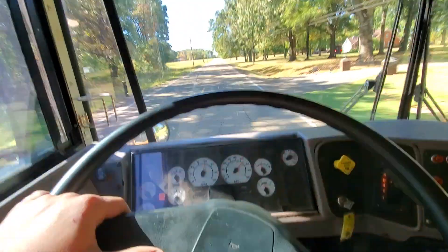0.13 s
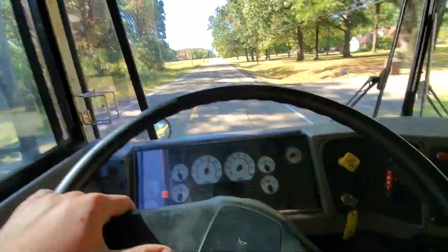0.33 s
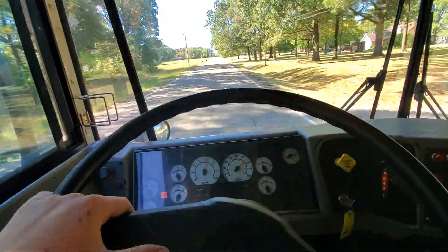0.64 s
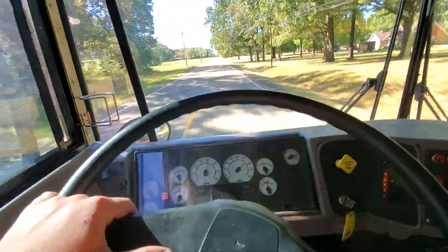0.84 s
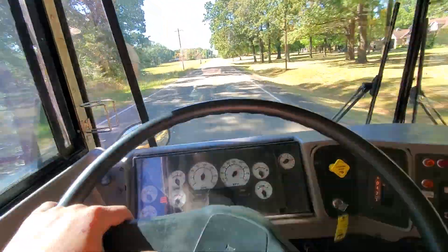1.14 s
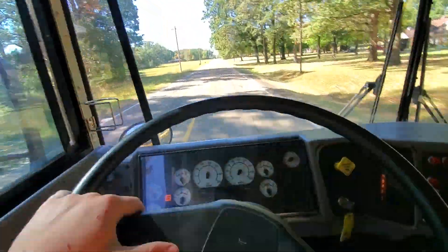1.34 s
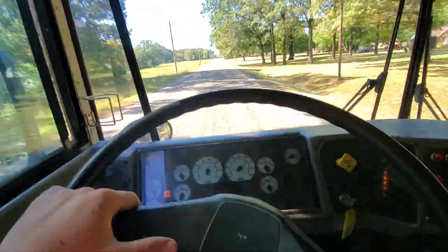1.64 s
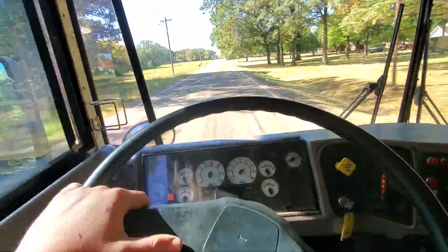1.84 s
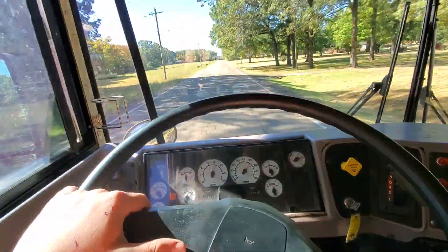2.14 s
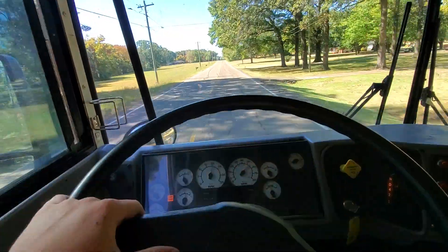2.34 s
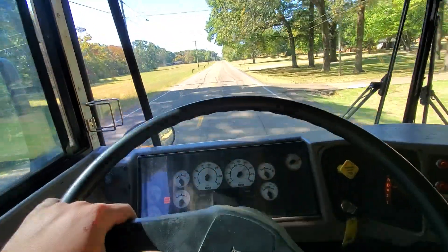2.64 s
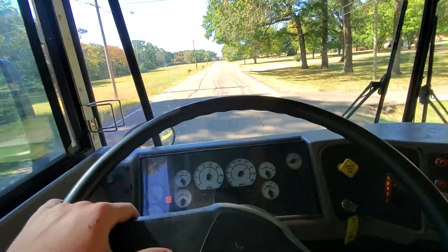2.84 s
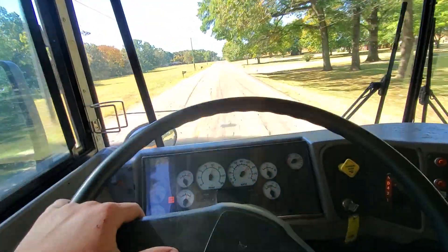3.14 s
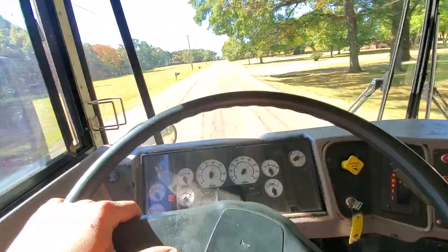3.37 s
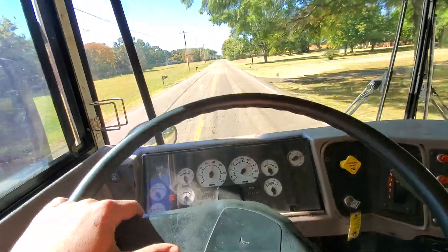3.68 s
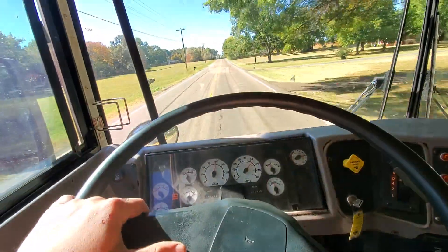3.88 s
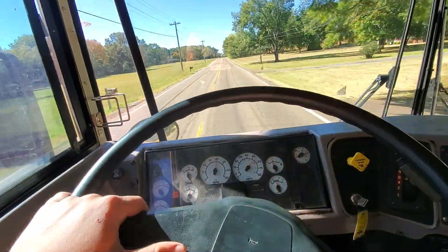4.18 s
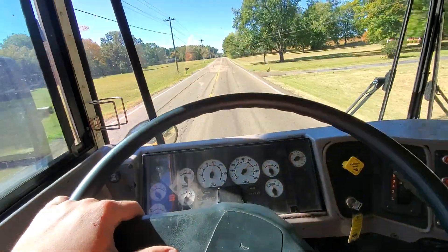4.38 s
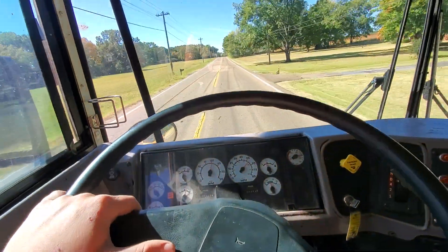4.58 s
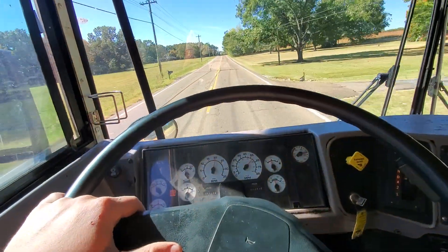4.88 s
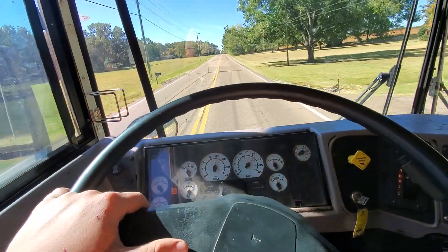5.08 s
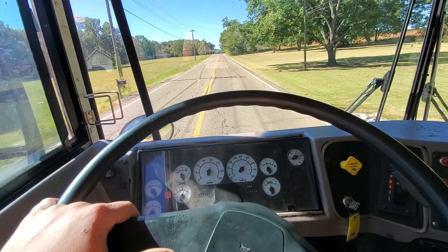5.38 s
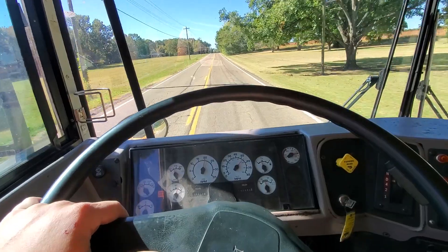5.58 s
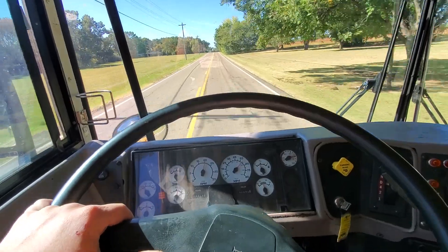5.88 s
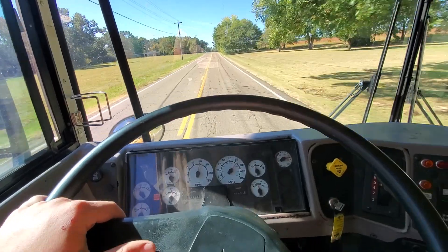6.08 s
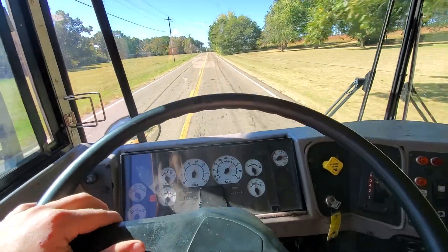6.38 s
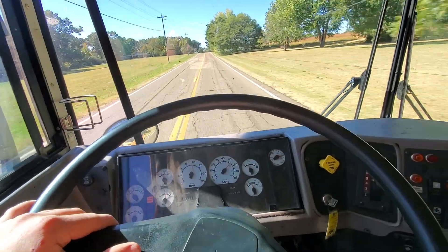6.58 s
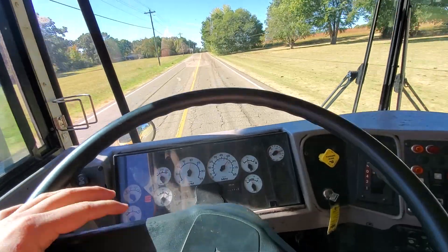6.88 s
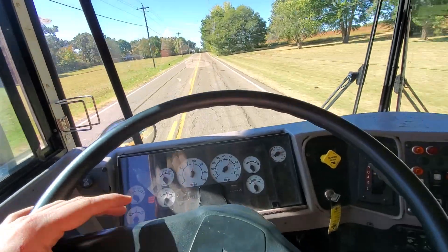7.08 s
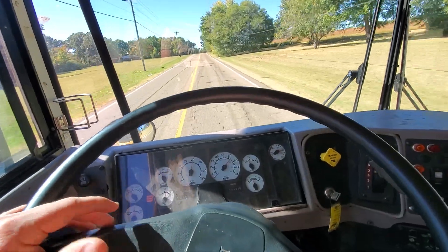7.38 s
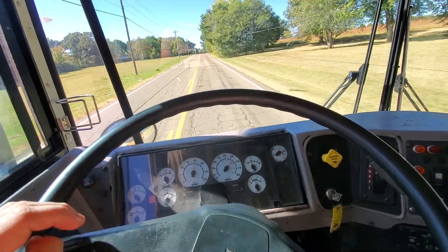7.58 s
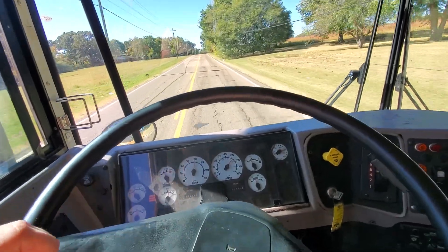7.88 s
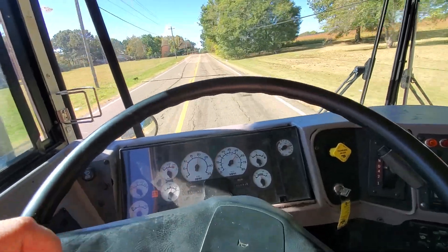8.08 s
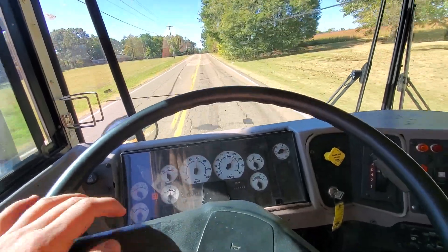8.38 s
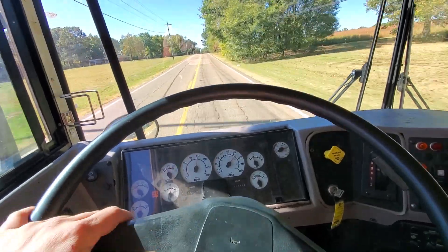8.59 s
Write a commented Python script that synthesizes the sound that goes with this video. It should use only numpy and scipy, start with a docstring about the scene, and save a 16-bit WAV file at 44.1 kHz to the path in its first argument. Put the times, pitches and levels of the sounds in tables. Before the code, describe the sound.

A diesel bus cruises along a country road, heard from the driver's seat for nearly nine seconds. From the start, a loud, deep engine drone holds one pitch with a fast throb, slightly stronger on the left. Tyres and rushing air roar steadily with it. Beneath these sit soft combustion clatter, a faint gear whine and a very thin, high turbo whistle. Bumps send short, low booms through the body at irregular intervals and lightly rattle the trim. The biggest boom comes at about 2.3 seconds, with a few small clicks. Coarse asphalt swells the road roar a little, most near 3.4 seconds. From 5 seconds, loose fittings give quiet, high ticks more often, and between about 5.9 and 7.3 seconds a small metal part chinks faintly several times. The drone and road noise carry on evenly to the end.

```python
"""A diesel bus cruising on a country road, heard from the driver's seat.
From the start the firing note beats against the propeller shaft's drone; combustion clatter and a thin
turbo whistle pass the engine cover, gears whine, tyres and air roar. Bumps boom in the body and rattle
loose fittings, with the biggest boom at 2.3 s. Coarse asphalt swells the roar most near 3.4 s.
From 5 s the fittings knock more often, and from 5.9 to 7.3 s a small metal part chinks."""
import sys
import numpy as np
from scipy import signal
from scipy.fft import rfft, irfft
from scipy.io import wavfile
from scipy.ndimage import uniform_filter1d

SR = 44100
rng = np.random.default_rng(int(sys.argv[2]) if len(sys.argv) > 2 else 0)


def unload_audio(sound):
    """Save the sound as a 16-bit wav file, at the path given as the first command line argument."""
    columns = np.transpose(np.atleast_2d(sound))
    # keep every value between -1 and 1, then stretch to whole-number steps
    steps = np.round(np.clip(columns, -1, 1) * 32767)
    wavfile.write(sys.argv[1], SR, steps.astype(np.int16))


N = 384548
TIME = np.arange(N) / SR
FREQ = np.maximum(np.arange(N // 2 + 1) * SR / N, 1)
CYLINDERS = 6


def engine_drone(cycles, low_db, high_db, waver_db, wander_rad):
    """Exhaust and block tones; the higher ones waver more as the cab flexes."""
    # engine tones (multiple of the cycle rate, relative left [dB], relative right [dB])
    orders = [(3, -37, -37), (6, -23.5, -24.5), (7, -44, -43), (9, -38.5, -41.5), (12, -41, -43),
              (15, -46, -51), (16, -44, -45), (18, -46, -44), (20, -55, -46), (30, -53, -46),
              (36, -55, -53), (39, -53, -64), (48, -57, -54), (54, -52, -54)]
    out = np.zeros((2, N))
    for order, left_db, right_db in orders:
        height = order / orders[-1][0]
        phase = 2 * np.pi * (order * cycles + rng.random()) + wander_rad * height * walk(4.8)
        offset_rad = np.array([[0], [1]]) * height ** 2 * np.pi / 2
        lift_db = low_db + (high_db - low_db) * height + waver_db * np.sqrt(height) * walk(2.5)
        gain = undb(np.array([[left_db], [right_db]]) + lift_db)
        out += np.sqrt(2) * gain * np.sin(phase + offset_rad)
    return out


def shaft_hum(firings, ratio, level_db, waver_db):
    """The propeller shaft hums just below the firing note, so the two beat."""
    gain = undb(level_db + waver_db * walk(2.4))
    return np.sqrt(2) * gain * np.sin(2 * np.pi * ratio * firings) * pan(1.2)


def body_boom(level_db, throb_db):
    """Bumps and the small unevenness between them shake the body into a deep boom."""
    # body spectrum (frequency [Hz], relative density [dB])
    spectrum = [(10, -73), (22, -61), (31, -37.5), (37, -35), (55, -30.5), (64, -33.5), (73, -28),
                (87, -32), (100, -42.5), (116, -46), (130, -59), (200, -99)]
    boom = colour(cab_noise(apart_hz=1200), response(spectrum))
    # flatten the noise's own swells so the road sets the level
    boom /= np.sqrt(uniform_filter1d(np.mean(boom ** 2, axis=0), SR // 8))
    return from_left(boom * undb(level_db + throb_db * walk(4.3)))


def bumps(attack_s, release_s):
    """Each jolt builds, holds and dies away; returns the boom and rattle lifts in dB."""
    # bumps under the wheels (start [s], length [s], boom lift [dB], rattle lift [dB])
    jolts = [(.25, .07, 3.5, 1.5), (0.402, 0.12, 4, 3), (0.723, 0.055, 4, -1), (1.295, 0.17, 4.5, 2),
             (1.628, 0.12, 3.5, 1), (1.876, 0.05, 6.5, 0), (2.313, 0.12, 8.5, 2), (2.69, .12, 4.5, -0.5),
             (2.987, 0.06, 3, -2), (3.29, .32, 3.5, 0.5), (3.724, 0.16, 6, 0.5), (4.2, 0.14, 3, -0.5),
             (4.85, 0.064, 2.5, -1), (5.581, .15, 6.5, 3), (5.76, .18, 1, 2), (6.358, 0.048, 7.5, 2),
             (6.54, 0.11, 5.5, 3.5), (6.7, .22, 1, 2), (7.013, 0.15, 6, 1), (7.4, 0.17, 3, -1),
             (7.99, 0.084, 3.5, 2), (8.36, 0.15, 5, 3)]
    out = np.zeros((2, N))
    for start_s, length_s, boom_db, rattle_db in jolts:
        attack = np.clip((TIME - start_s) / attack_s, 0, 1)
        release = np.exp(-np.maximum(TIME - start_s - length_s, 0) / release_s)
        out += np.outer([boom_db, rattle_db], attack * release)
    return out


def road_roar(gain_db, flicker_db):
    """Tyres roar on the asphalt and air rushes past the windows."""
    # tyre and air spectrum (frequency [Hz], relative density [dB])
    spectrum = [(70, -65), (125, -56.5), (180, -49.5), (260, -53.5), (340, -58), (390, -57.5), (510, -61.5),
                (620, -67), (800, -65), (980, -67), (1400, -71), (2200, -75), (5000, -83.5), (8000, -108)]
    roar = colour(cab_noise(apart_hz=880), response(spectrum))
    return roar * undb(gain_db + flicker_db * walk(6.5))


def coarse_asphalt():
    """The tyres run on and off each coarse stretch: a smooth swell in dB."""
    # coarse stretches (middle [s], length [s], roar lift [dB])
    patches = [(.25, 0.8, 1.5), (1.347, 1, 1.5), (2.42, 0.27, 1.1), (3.44, 0.74, 3), (5.75, .4, 1),
               (6.25, 0.54, 0.5), (6.92, .3, .9), (8.002, .35, 1.2), (8.4, 0.43, 2)]
    return sum(db * np.exp(-(2 * (TIME - middle_s) / length_s) ** 2) for middle_s, length_s, db in patches)


def clatter(firings, ring_s, rise_s, scatter_db, jitter_s, hiss_share, pulse_depth, gain_db):
    """Each cylinder's firing rings the block in its own way, over faintly pulsing gas hiss."""
    # clatter through the cover (frequency [Hz], relative left density [dB], relative right density [dB])
    spectrum = [(306, -83, -87), (710, -68, -73.5), (1500, -74.5, -77), (2140, -75, -73.5),
                (2640, -71, -70.5), (3400, -71, -69.5), (3850, -75.5, -71), (5080, -85.5, -77),
                (6000, -82.5, -76.5), (6660, -81, -76), (7380, -95, -88), (7960, -104, -104)]
    # cover and panel resonances (frequency [Hz], width [Hz], left lift [dB], right lift [dB])
    panels = [(1255, 42, 5.5, 1), (1400, 40, 8, 4), (2030, 19, 0, 6), (2457, 32, 8.5, -1), (2640, 47, 4, 3),
              (2707, 35, 5.5, 2), (2870, 25, -9, 6.5), (2880, 21, -8, 4.5), (3087, 21, -8, 11),
              (3304, 47, 7.5, 8.5), (3400, 40, 4.5, 4), (3700, 20, 3, 0), (3953, 27, -6, 6.5),
              (5780, 60, -6, 3.5), (6340, 150, 2.5, 0)]
    firing_s = np.interp(np.arange(1, int(firings[-1])), firings, TIME)
    jitter, scatter = rng.standard_normal((len(firing_s), 2)).T
    onsets = np.clip(((firing_s + jitter_s * jitter) * SR).astype(int), 0, N - 1)
    strength = undb(scatter_db * scatter)
    t = TIME[:SR // 10]
    envelope = np.exp(-t / ring_s) * (1 - np.exp(-t / rise_s))  # the cover blunts each blow
    blows = np.zeros((2, N))
    for cylinder in range(CYLINDERS):
        train = np.zeros(N)
        train[onsets[cylinder::CYLINDERS]] = strength[cylinder::CYLINDERS]
        ring = rng.standard_normal((2, len(t))) * envelope * undb(2.0 * rng.standard_normal())
        blows += signal.fftconvolve(train[None], ring, axes=1)[:, :N]
    hiss = cab_noise(apart_hz=920) * (1 + pulse_depth * np.cos(np.pi * firings))
    source = np.sqrt(1 - hiss_share) * unit(blows) + np.sqrt(hiss_share) * unit(hiss)
    lift_db = sum(np.array([[left_db], [right_db]]) / (1 + (2 * (FREQ - hz) / width_hz) ** 2)
                  for hz, width_hz, left_db, right_db in panels)
    return colour(source, response(spectrum) * undb(lift_db + gain_db))


def trim_rattle(level_db, flicker_db, spread_db, ticks_per_s, ring_s, bed_power):
    """Trim and window frames make many tiny contacts over a bed of hiss."""
    # chatter spectrum (frequency [Hz], relative left [dB], relative right [dB])
    spectrum = [(3000, -18, -17), (8000, -9.5, -6.5), (9800, -2.5, -10.5), (10700, -1.5, 0.5),
                (11700, -3, -1.5), (13500, -0.5, -3), (15800, 0.5, -1.5)]
    chance, size = rng.random((N, 2)).T
    ticks = (chance < ticks_per_s / SR) * undb(-spread_db * np.log(np.maximum(size, .02)))
    power = signal.fftconvolve(ticks ** 2, np.exp(-2 * TIME[:SR // 20] / ring_s))[:N]
    envelope = np.sqrt(np.abs(power / power.mean()) + bed_power)
    chatter = colour(rng.standard_normal((2, N)) * envelope, response(spectrum))
    return unit(chatter) * undb(level_db + flicker_db * walk(8))


def knocks(gain_db, ring_s, rise_s, width_hz, crack_gain, bounce_s, bounce_gain):
    """A loose fitting strikes, rings briefly and bounces once."""
    # fitting strikes (time [s], relative level [dB], ring [Hz])
    strikes = [(0.3844, -40, 10500), (1.2994, -43, 12100), (1.6994, -39, 11100), (2.2237, -37, 11000),
               (2.3181, -39, 11300), (2.3967, -34, 12700), (2.42, -33, 14500), (5.1053, -38, 12300),
               (5.4201, -31, 14800), (6.113, -35, 13500), (6.4308, -33, 12100), (6.6687, -33, 14100),
               (6.8932, -32, 15300), (7.0524, -40, 10300), (7.1546, -31, 15400), (8.0137, -32, 14900),
               (8.4706, -33, 15500), (8.5185, -32, 14600), (8.5999, -40, 10500)]
    out = np.zeros((2, N + SR))
    t = TIME[:SR // 10]
    hz = np.arange(len(t) // 2 + 1) * SR / len(t)
    for start_s, level_db, ring_hz in strikes:
        gap_s = bounce_s * (1 / 2 + rng.random())
        strike = (1 - np.exp(-t / rise_s)) * np.exp(-t / ring_s)
        bounce = bounce_gain * (t > gap_s) * np.exp(-np.abs(t - gap_s) / ring_s)
        resonance = 1 / np.hypot(1, 2 * (hz - ring_hz) / width_hz)
        crack = crack_gain * hz / (hz + 3000)
        ring = unit(irfft(rfft(rng.standard_normal((2, len(t)))) * (resonance + crack), len(t)))
        onset = int(start_s * SR)
        out[:, onset:onset + len(t)] += ring * (strike + bounce) * undb(level_db + gain_db)
    return out[:, :N] * pan(1.8)


def chinks(ring_hz, ring_s, rise_s, gain_db):
    """A small metal part is nudged and rings on one high note."""
    # nudges (time [s], relative level [dB])
    nudges = [(5.855, -45), (6.503, -50), (6.60, -54), (6.70, -53), (7.287, -49)]
    out = np.zeros(N)
    for start_s, level_db in nudges:
        t = np.maximum(TIME - start_s, 0)
        envelope = (1 - np.exp(-t / rise_s)) * np.exp(-t / ring_s)
        out += undb(level_db + gain_db) * envelope * np.sin(2 * np.pi * ring_hz * t)
    return out * pan(2.5)


def gear_whine(cycles, meshes_per_cycle, gain_db, wander_rad, waver_db):
    """Timing gear teeth mesh in a faint whine on the left."""
    # whine strength (time [s], relative level [dB])
    whine_db = [(0, -49), (2, -50.5), (4, -49.5), (5.3, -47.5), (6.5, -54), (7.6, -54), (8.7, -52)]
    phase = 2 * np.pi * meshes_per_cycle * cycles + wander_rad * walk(2.3)
    gain = undb(curve(whine_db) + gain_db + waver_db * walk(5.4))
    return np.sqrt(2) * gain * np.sin(phase) * pan(4.2)


def turbo_whistle(level_db, width_hz, flutter_db):
    """The turbocharger's blades give a thin, breathy whistle."""
    # blade tone, easing and rising with the boost (time [s], frequency [Hz])
    blade_hz = [(0, 10660), (.65, 10420), (1.8, 10300), (2.3, 10460), (2.7, 10430), (5.3, 10350),
                (5.92, 10580), (6.3, 10380), (7.3, 10400), (8.7, 10500)]
    phase = 2 * np.pi * np.cumsum(curve(blade_hz)) / SR
    out = np.zeros((2, N))
    for ear in range(2):
        in_phase = walk(width_hz) + 0.85 * walk(5 * width_hz)
        out[ear] = in_phase * np.cos(phase) + walk(width_hz) * np.sin(phase)
    return unit(out) * undb(level_db + flutter_db * walk(4.8))


def cab_noise(apart_hz):
    """Diffuse noise at two ears: alike in the bass, opposed just above apart_hz, unrelated higher up."""
    coherence = .98 * np.cos(np.pi / 2 * FREQ / apart_hz) / (1 + (FREQ / (1.7 * apart_hz)) ** 4)
    mid, side = rfft(rng.standard_normal((2, N))) * np.sqrt([(1 + coherence) / 2, (1 - coherence) / 2])
    return irfft([mid + side, mid - side], N)


def from_left(pair, lag_s=.0004):
    """Sound from the driver's side reaches the right ear later."""
    return np.array([pair[0], np.pad(pair[1], (int(lag_s * SR), 0), mode="edge")[:N]])


def pan(db):
    """Stereo gains, left louder by db."""
    return undb(np.array([[db], [-db]]) / 2)


def undb(db):
    """Decibels to gain."""
    return 10 ** (np.asarray(db) / 20)


def unit(x):
    """Scale to rms 1."""
    return x / np.sqrt(np.mean(x ** 2))


def curve(table):
    """Piecewise-linear control in time."""
    return np.interp(TIME, *np.transpose(table))


def walk(rate_hz):
    """Smooth random control of rms 1, rolling off at rate_hz."""
    return unit(irfft(rfft(rng.standard_normal(N)) * np.exp(-(FREQ / rate_hz) ** 2), N))


def response(table):
    """Gain over frequency, one row per dB column; zero outside the table."""
    hz, *columns = np.transpose(table)
    return undb([np.interp(np.log(FREQ), np.log(hz), db, -np.inf, -np.inf) for db in columns])


def colour(x, gain):
    """Filter white sound of rms 1 to the given spectral density."""
    return irfft(rfft(x) * gain, N) * np.sqrt(SR / 2)


def scene():
    """Engine speed drives drone, shaft, clatter and gears; the road lifts boom, roar and rattle."""
    # engine speed (time [s], firing rate [Hz])
    firing_hz = [(0, 100.9), (2, 101), (4.5, 100.9), (6.5, 100.8), (8.7, 100)]
    firings = np.cumsum(curve(firing_hz)) / SR
    cycles = firings / CYLINDERS
    coarse_db = coarse_asphalt()
    jolt_db, shake_db = bumps(attack_s=0.019, release_s=0.029)
    tones = engine_drone(cycles, low_db=1, high_db=-0.5, waver_db=2.0, wander_rad=1.0)
    tones += shaft_hum(firings, ratio=.9053, level_db=-19.0, waver_db=-0.45)
    road = body_boom(level_db=jolt_db - 18.5, throb_db=1.0)
    road += road_roar(gain_db=coarse_db - .5, flicker_db=0.85)
    combustion = clatter(firings, ring_s=0.018, rise_s=0.0042, scatter_db=2.0, jitter_s=.00002,
                         hiss_share=0.49, pulse_depth=0.032, gain_db=-.5)
    combustion *= undb(0.56 * coarse_db)  # this layer also carries road hiss, which swells on coarse asphalt
    whines = gear_whine(cycles, meshes_per_cycle=56, gain_db=-2, wander_rad=0.42, waver_db=1.2)
    whines += turbo_whistle(level_db=-61.5, width_hz=45, flutter_db=2.5)
    cab = trim_rattle(level_db=shake_db + .3 * coarse_db - 51.0, flicker_db=1.2, spread_db=3,
                      ticks_per_s=230, ring_s=0.011, bed_power=3.3)
    cab += knocks(gain_db=-5, ring_s=.011, rise_s=.0015, width_hz=2700,
                  crack_gain=0.13, bounce_s=0.011, bounce_gain=.4)
    cab += chinks(ring_hz=13450, ring_s=.009, rise_s=.006, gain_db=8)
    return from_left(tones) + road * pan(0.53) + combustion + whines + cab


def record(dry):
    """Steep low-pass at 15.75 kHz."""
    return signal.sosfilt(signal.ellip(12, .2, 80, 15750, fs=SR, output="sos"), dry)


dry = scene()
out = record(dry)
unload_audio(out)
```